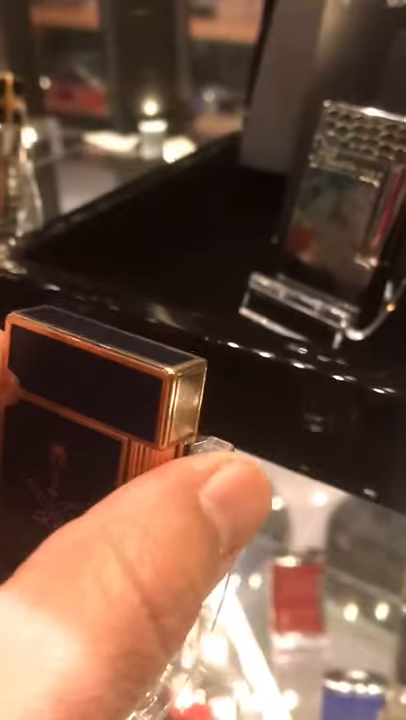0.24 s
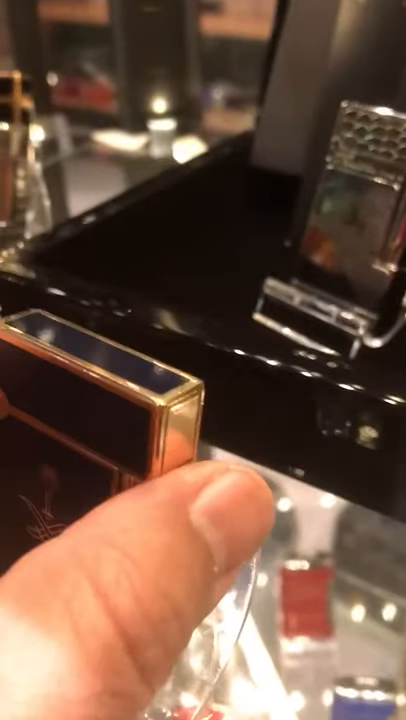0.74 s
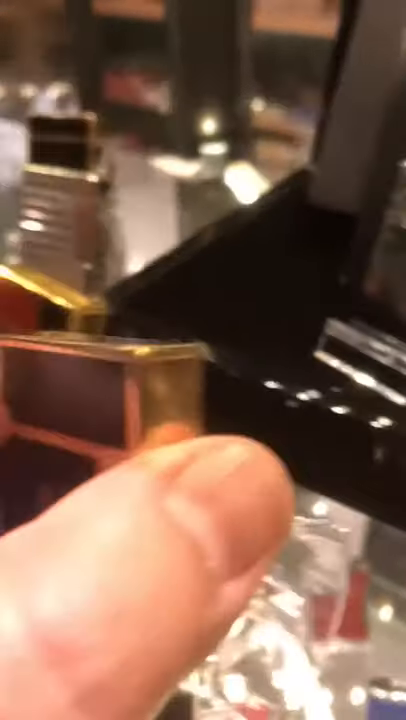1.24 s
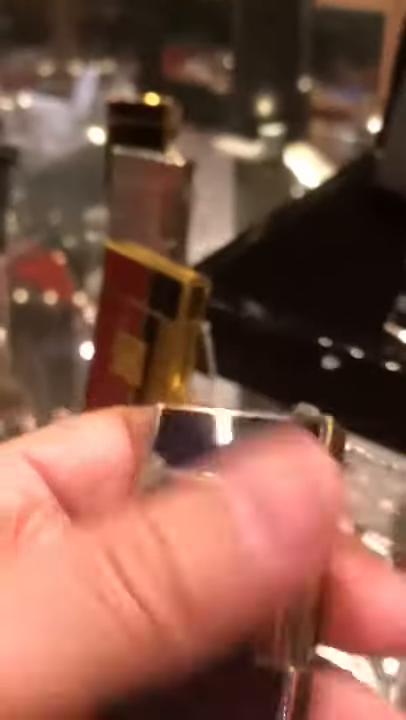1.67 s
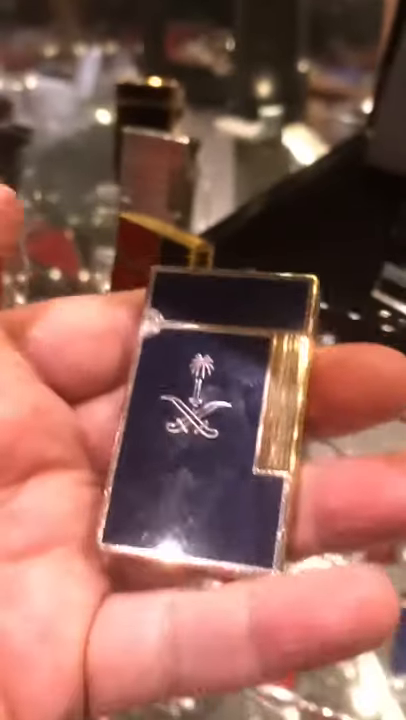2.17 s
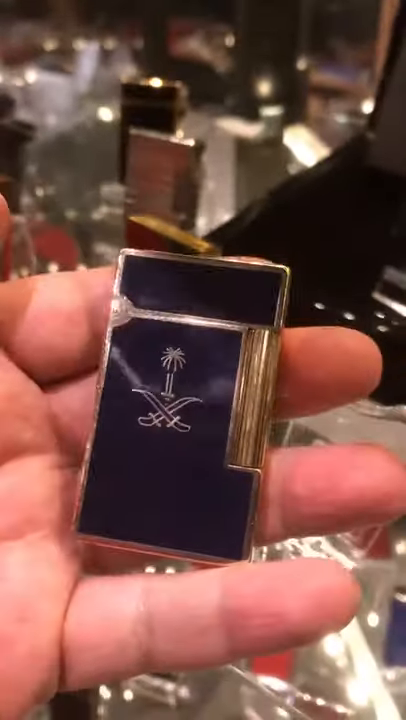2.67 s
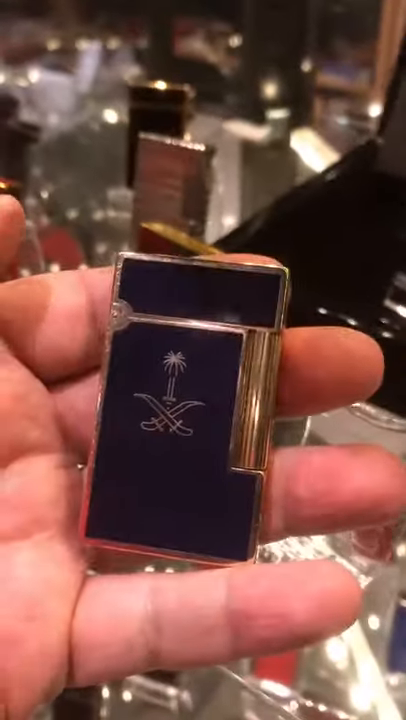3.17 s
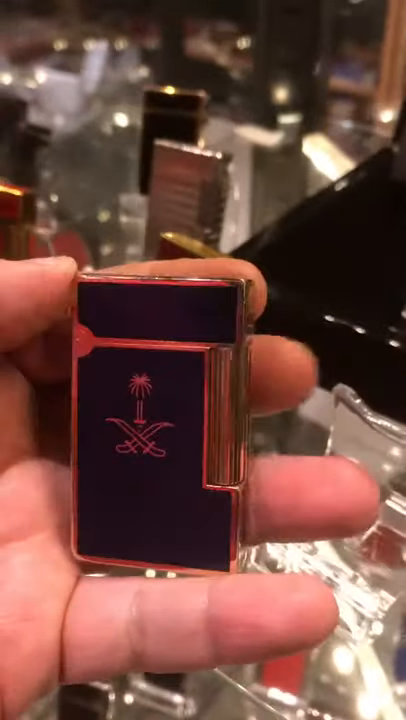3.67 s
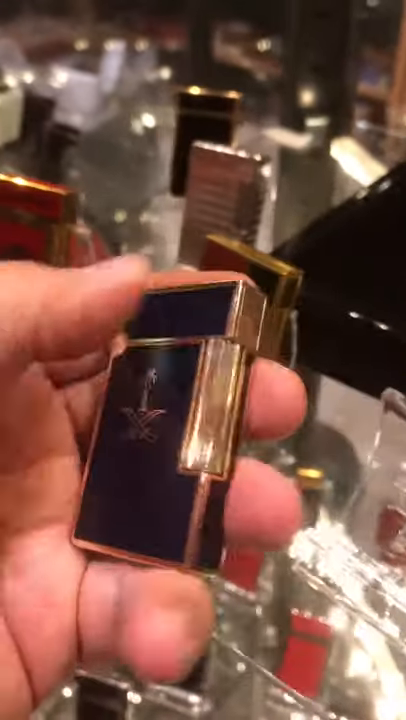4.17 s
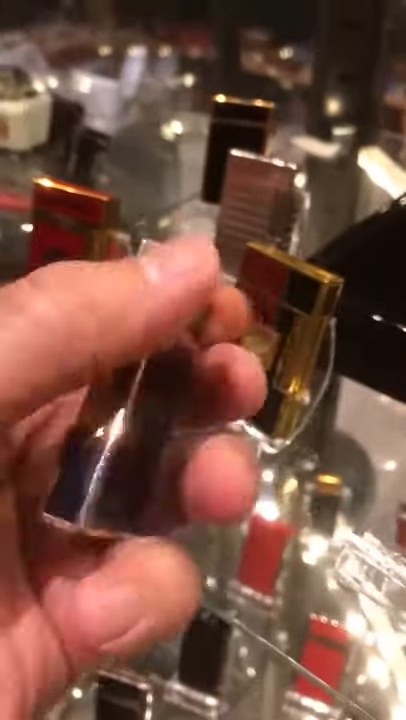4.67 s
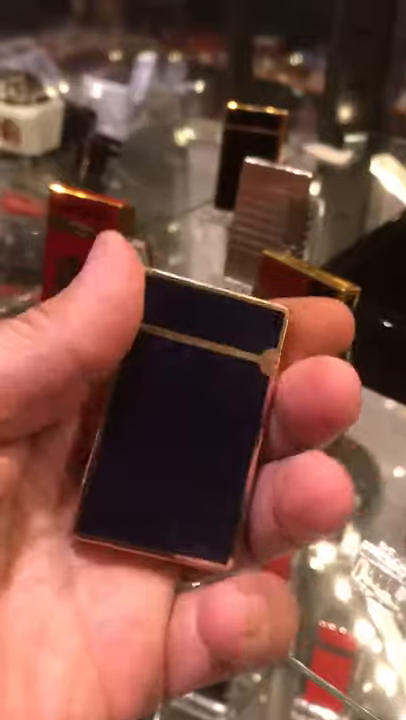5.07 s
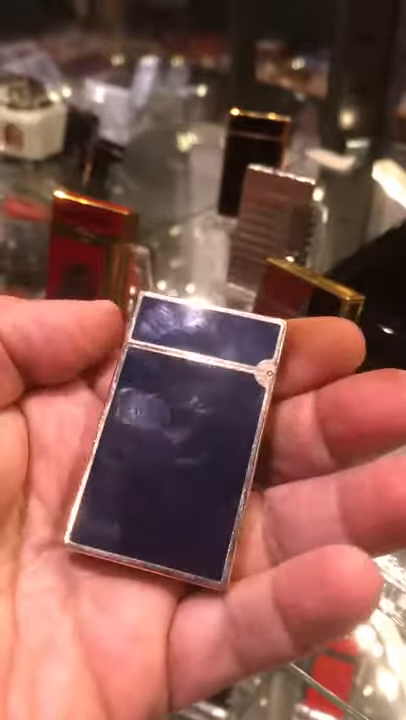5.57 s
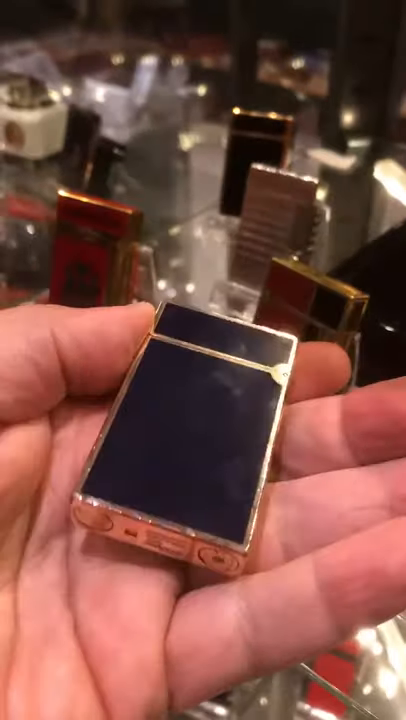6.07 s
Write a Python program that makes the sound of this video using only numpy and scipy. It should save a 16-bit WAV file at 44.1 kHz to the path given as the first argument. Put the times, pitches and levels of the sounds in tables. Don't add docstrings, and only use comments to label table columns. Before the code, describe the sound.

A steady low rumble with hum and faint hiss fills an indoor shop. Right by the microphone, a hand shifts on a small metal case, with a light tick and tiny high creaks, then the lid hits sharply once, bouncing within a tenth of a second and ringing brightly. The ring and light rattle die quickly; a few faint palm scuffs follow in the background drone.

```python
import sys
import numpy as np
from scipy import signal
from scipy.fft import rfft, irfft
from scipy.io import wavfile

SR = 44100
rng = np.random.default_rng(int(sys.argv[2]) if len(sys.argv) > 2 else 0)


def gain_from_db(level_db):
    decades = np.asarray(level_db, float) / 20
    return 10 ** decades


def bounce(signal):
    frames = np.transpose(np.atleast_2d(signal))
    limited = np.clip(frames, -1, 1)
    pcm = np.round(limited * 32767).astype(np.int16)
    wavfile.write(sys.argv[1], SR, pcm)


N = 278271

# pitch_hz, level_db per Hz
RUMBLE = [(15, -38.5), (26, -6.5), (48, -3), (63, -1.5), (75, -5), (90, -5.5), (108, -2), (135, -6),
          (150, -9.5), (188, -11), (207, -11.5), (225, -23.5), (293, -19), (330, -26.5), (450, -30.5),
          (580, -62.5), (990, -120)]
# pitch_hz, level_db per Hz
DUCT_AIR = [(260, -34), (450, -7), (578, -8.5), (630, -5), (658, -11), (809, -6.5), (946, -10.5),
            (2000, -17.5), (2600, -46), (4400, -120)]
# pitch_hz, level_db per Hz
HISS = [(1180, -30.5), (2000, -3), (2900, -2.5), (4140, -9), (4700, -11.5), (4900, -15), (5300, -13),
        (6400, -13.5), (7600, -19.5), (8600, -19), (10000, -22), (10450, -29.5), (10900, -23), (15900, -24)]
# pitch_hz, level_db (rms)
MACHINE_TONES = [(100.1, -38.5), (200.2, -57), (500.3, -65.5), (600, -76), (619.2, -62), (700.5, -67),
                 (719, -68.5), (821, -73), (900.5, -77.5), (1038, -70), (1599, -76), (10799, -101)]
# pitch_hz, width_hz, level_db (rms)
FANS = [(40.38, 2.6, -52), (59.85, 7.74, -41.5), (123.34, 14, -45), (177.6, 16, -51.5)]
# pitch_hz, width_hz, level_db (rms)
LAMP_WHISTLE = (12735, 480, -83.5)
RUMBLE_DB, DUCT_AIR_DB, HISS_DB = -35.5, -55.24, -63.26

# start_s, length_s, final level_db, swell_db
RUBS = [
    (.006, .084, -70, 24),
    (.16, .08, -75, 8),
    (.597, .025, -72, 3),
    (.745, .025, -63, -8),
    (.77, 0.3, -68, -3.5),
    (1.22, 0.18, -72, 17),
    (1.46, .05, -72, 10),
    (1.57, 0.077, -72, 7),
    (1.66, 0.12, -81, -4),
]
# pitch_hz, level_db per Hz
SKIN = [(3000, -11), (5000, 4.5), (9000, 0), (14000, -3), (16000, -7)]
# start_s, length_s, final level_db, swell_db
CREAKS = [
    (.025, .06, -77, 8),
    (.09, .07, -86, -4),
    (.185, .06, -67, 8),
]
# pitch_hz, width_hz, level_db
CREAK_BANDS = [(6560, 500, -4), (11777, 400, -3), (13860, 350, 2), (15000, 900, -2)]
# start_s, length_s, final level_db, swell_db
PALM_TURNS = [(3.59, .024, -81, 12), (3.9, 0.023, -82, 14), (3.97, .164, -87, 11), (4.59, .01, -84, 14),
              (4.435, .006, -80, 3), (4.68, .145, -78, 3), (5.2, 0.099, -75, 17), (5.33, .024, -83, 8),
              (5.665, .006, -79, 3), (6.234, .036, -80, 13), (6.29, .02, -79, 10)]
# pitch_hz, level_db per Hz
PALM = [(5000, -10), (8000, 1), (11000, 0), (14000, 1.5), (16000, 2)]
LET_GO_DB_PER_S, TOUCH_DB_PER_S = 600, 1500
# time_s, level_db
SLIP = [
    (.61, -62),
    (.619, -51),
    (.625, -47),
    (.6293, -40),
]

# time_s, case drive_db, lid drive_db, contact softness_db
BLOWS = [(0.3168, -41, -45, 12), (.6063, -43, -49, 7), (0.6291, -1.5, -10, 8), (.6328, -11, -13.5, 4),
         (0.6357, -16.5, -15, 10), (.638, -7, -19, 2.5), (.6497, -6, -12.5, 10.5), (.6532, -23, -17, 16),
         (0.6636, -16, -7, 4.5), (0.6669, -18, -17, 5), (0.6713, -23, -16.5, 7), (0.6796, -16, -31.5, 9.5),
         (.686, -21.5, -29.5, 21), (.7025, -28, -23, 17), (.7078, -23.5, -21, 15), (0.7114, -30, -23.5, 16),
         (0.7332, -23, -27, 13), (.752, -29, -37, 21)]
# pitch_hz, level_db, t60_s
CASE = [(530, -26.5, 0.02), (781.7, -26.5, 0.044), (1423, -21, .03), (1560, -18.5, .04), (1870, -15.5, .04),
        (2450, -15, .045), (2620, -16.5, 0.079), (2918, -12, .03), (3120, 0, .007), (3590, -3.5, .012),
        (3910, -12.5, .035), (4186, -12, 0.038)]
# pitch_hz, level_db, t60_s
LID = [(4650, -13, .04), (5130, -10, .04), (5330, -13, .045), (6023, -7, .04), (6055, -6, .035),
       (6300, -14, .045), (6480, -12, .05), (6605, -8.5, .045), (7745, -8, .03), (8027, -12, .035),
       (8660, -9, .035), (9215, -14, .04), (9570, -20, .035), (10435, -7, .033), (10930, -14, .03),
       (11255, -8, .035), (11700, -13, .04), (11900, -18, .03), (13495, -8, .033), (14020, -2.5, .032),
       (14540, -14, .03)]
# pitch_hz, level_db, t60_s
SINGING = [(5200, -50, .6), (5170, -51, .5), (6024, -50, .6), (6492, -50, .5), (6600, -46, .5),
           (8656, -46, .6), (10435, -52, .3), (11230, -42, .35), (14020, -56, .3)]
# pitch_hz, level_db, t60_s
THUMP = (240, -50, .08)
PART_EDGES_HZ = [350, 2200, 4500, 7200, 12500, 16000]
PART_DB = [11, 0.5, 0.49, 1.997, 5.5]
THUD_DB, THUD_PER_SOFT = -7, 0.3508
MID_LOSS, TOP_LOSS = 1.01, 1.198
RING_PER_DRIVE = .3
HELD_DB = -2.5

# pitch_hz, level_db, t60_s
RATTLE = [(356.5, -36.5, 0.2192), (550, -28, 0.29), (1000, -20.5, .2), (2000, -16, 0.22), (4002, -18, 0.24),
          (5618, -14, 0.11), (8000, -20, 0.11), (12510, -16.5, .08), (15000, -16.5, .1)]
# pitch_hz, level_db, t60_s
ECHO = [(350.4, -56.5, .6), (1000, -52.5, 0.88), (1998.5, -49.5, .9), (3402, -44.5, 1.1),
        (4302, -48.5, 1.2), (5600, -54.5, 0.53), (8000, -60.5, .4), (15010, -62, 0.27)]


def rms_one(x):
    return x / np.sqrt(np.mean(x ** 2) + 1e-20)


def coloured(spectrum):
    hz, db = np.transpose(spectrum)
    axis = np.log(np.arange(N // 2 + 1) * SR / N + 1)
    gain = gain_from_db(np.interp(axis, np.log(hz), db, left=-200, right=-200))
    return rms_one(irfft(gain * rfft(rng.standard_normal(N)), N))


def narrow(hz, width_hz):
    r = np.exp(-np.pi * width_hz / SR)
    poles = [1, -2 * r * np.cos(2 * np.pi * hz / SR), r * r]
    once = signal.lfilter([1, 0, -1], poles, rng.standard_normal(N + SR))
    twice = signal.lfilter([1, 0, -1], poles, once)
    return rms_one(twice[SR:])


def background():
    t = np.arange(N) / SR
    hum = sum(gain_from_db(db + 3) * np.sin(2 * np.pi * (hz * t + rng.random())) for hz, db in MACHINE_TONES)
    fans = sum(gain_from_db(db) * narrow(hz, width_hz) for hz, width_hz, db in FANS + [LAMP_WHISTLE])
    rumble = gain_from_db(RUMBLE_DB) * coloured(RUMBLE)
    air = gain_from_db(DUCT_AIR_DB) * coloured(DUCT_AIR) + gain_from_db(HISS_DB) * coloured(HISS)
    return rumble + air + hum + fans


def strokes(rows):
    t = np.arange(N) / SR
    power = 0
    for start, length, db, swell_db in rows:
        late = t - start
        shape = db - swell_db * (1 - np.clip(late / length, 0, 1))
        shape = shape + TOUCH_DB_PER_S * np.minimum(late, 0)
        shape = shape - LET_GO_DB_PER_S * np.maximum(late - length, 0)
        power = power + gain_from_db(2 * np.maximum(shape, -200))
    return np.sqrt(power)


def skin_grain():
    return gain_from_db(1.7 * rng.standard_normal(N // 32 + 1)).repeat(32)[:N]


def finger_rubs():
    return strokes(RUBS) * gain_from_db(1.5) * rms_one(skin_grain() * coloured(SKIN))


def hinge_creak():
    creak = rms_one(sum(gain_from_db(db) * narrow(hz, width_hz) for hz, width_hz, db in CREAK_BANDS))
    return strokes(CREAKS) * gain_from_db(2.5) * creak


def ring(force, hz, t60):
    r = gain_from_db(-60 / (t60 * SR))
    w = 2 * np.pi * hz / SR
    return signal.lfilter([0, np.sin(w)], [1, -2 * r * np.cos(w), r * r], force + 1e-18)


def snap():
    size = SR + SR // 2
    s, case_db, lid_db, soft_db = np.transpose(BLOWS)
    thud_db = case_db + THUD_DB + THUD_PER_SOFT * soft_db
    lid_mid_db = lid_db - MID_LOSS * soft_db
    lid_top_db = lid_db - TOP_LOSS * soft_db
    drive_db = PART_DB + np.transpose([thud_db, case_db, lid_db, lid_mid_db, lid_top_db])
    light_db = RING_PER_DRIVE * np.minimum(np.maximum(case_db, lid_db) + 15, 0)

    at = np.round(s * SR).astype(int)
    age = np.arange(200) / SR
    chatter = rng.standard_normal((len(at), len(age))) * gain_from_db(-20 - 60 * age / .005)
    chatter[:, 0] = 1

    def force(blow_db):
        train = np.zeros(size)
        for i, burst, db in zip(at, chatter, blow_db):
            train[i:i + len(age)] += gain_from_db(db) * burst
        return train

    modes = CASE + LID + [(hz, db + HELD_DB, t60) for hz, db, t60 in SINGING]
    contact_db = 1.7 * rng.standard_normal((len(at), len(modes)))
    hz, thump_db, t60 = THUMP
    rings = ring(force(drive_db[:, 0] + thump_db), hz, t60)
    for k, (hz, mode_db, t60) in enumerate(modes):
        part = np.searchsorted(PART_EDGES_HZ, hz) - 1
        blow_db = drive_db[:, part] + light_db + mode_db + contact_db[:, k]
        rings = rings + (-1) ** k * ring(force(blow_db), hz, t60)

    crack = 0
    for part, db in enumerate((5.94, 7.1, 5.4, 4, 4.01)):
        band = signal.butter(2, PART_EDGES_HZ[part:part + 2], "band", fs=SR, output="sos")
        crack = crack + signal.sosfilt(band, force(drive_db[:, part] + db))
    return rings, crack


def dying_noise(table):
    age = np.arange(SR // 2 + SR // 4) / SR
    table_hz, table_db, table_t60 = np.transpose(table)
    edges = 300 * 2 ** np.arange(0, 6.1, .5)
    tail = 0
    for low, high in zip(edges, edges[1:]):
        centre = np.log(low * high) / 2
        db = np.interp(centre, np.log(table_hz), table_db)
        t60 = np.interp(centre, np.log(table_hz), table_t60)
        band = signal.butter(2, [low, high], "band", fs=SR, output="sos")
        noise = signal.sosfilt(band, rng.standard_normal(len(age)))
        tail = tail + noise * gain_from_db(db - 60 * age / t60)
    return tail * np.clip(age / .002, 0, 1)


def shop(rings, crack):
    rattle = signal.fftconvolve(crack, dying_noise(RATTLE))
    echo = signal.fftconvolve(crack + gain_from_db(-11.5) * rings, dying_noise(ECHO))
    heard = rings + gain_from_db(-7.0) * crack + (rattle + echo)[:len(rings)]
    port = signal.cheby2(4, 30, 16600, fs=SR, output="sos")
    return signal.sosfilt(port, heard)


def spring_whine():
    s, db = np.transpose(SLIP)
    t = np.arange(N) / SR
    gain = gain_from_db(np.interp(t, s, db, left=-150, right=-150))
    phase = 2 * np.pi * 3090 * t
    return gain * (np.sin(phase) + .3 * np.sin(1.95 * phase))


def palm_turns():
    return strokes(PALM_TURNS) * gain_from_db(3.5) * rms_one(skin_grain() * coloured(PALM))


def scene():
    hand = finger_rubs() + hinge_creak() + spring_whine() + palm_turns()
    lighter = shop(*snap())
    mix = background() + hand + np.pad(lighter, (0, N - len(lighter)))
    return mix[None]


def band_limit(x):
    return signal.sosfilt(signal.butter(12, 16570, fs=SR, output="sos"), x)


def record(dry):
    soft = 1.05 * np.tanh(dry / 1.05)
    low_cut = signal.butter(8, 33, "high", fs=SR, output="sos")
    top_cut = signal.ellip(12, .3, 45, 15750, fs=SR, output="sos")
    finished = signal.sosfilt(top_cut, signal.sosfilt(low_cut, soft))
    return band_limit(finished)


dry = scene()
out = record(dry)
bounce(out)
```